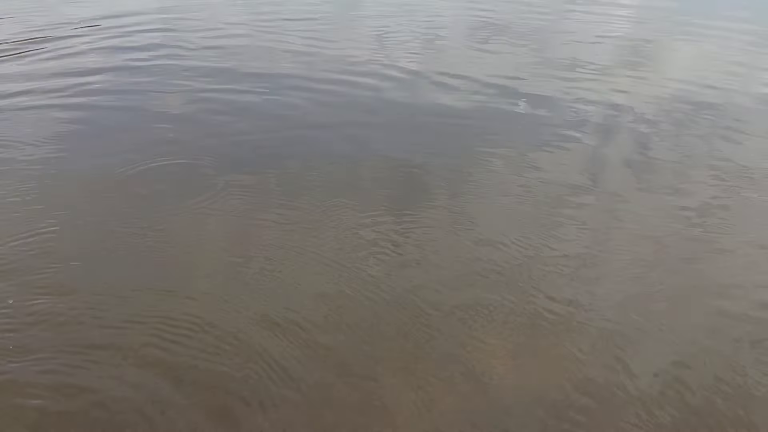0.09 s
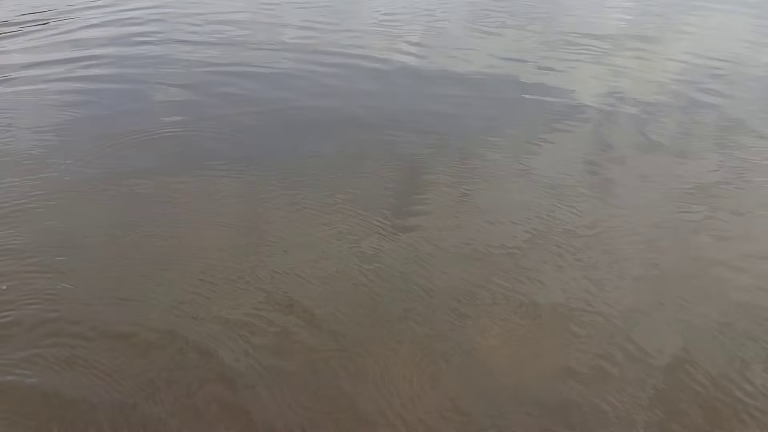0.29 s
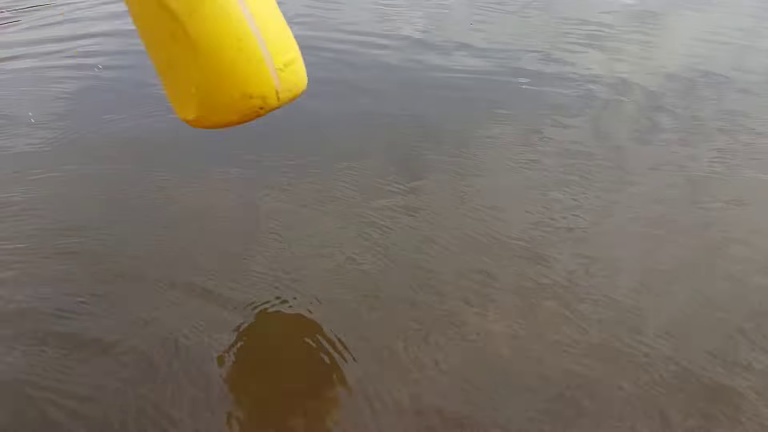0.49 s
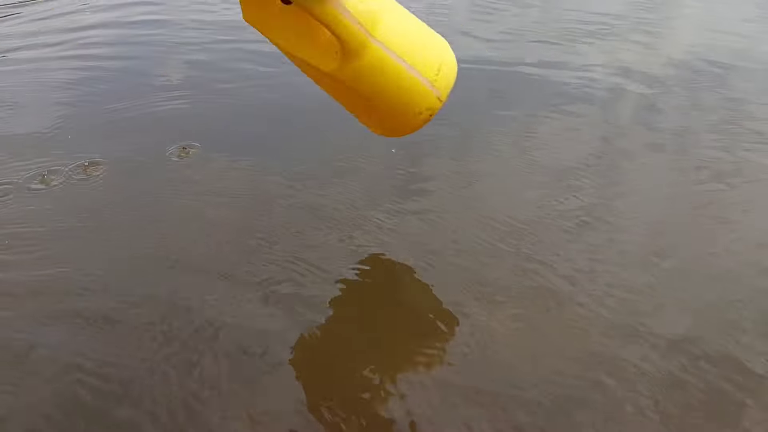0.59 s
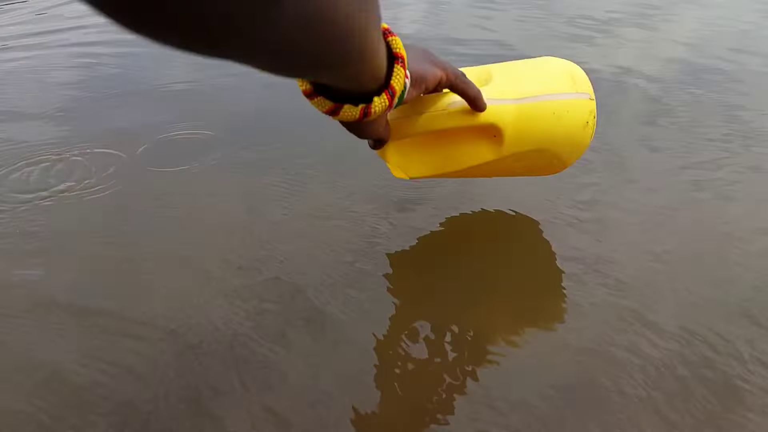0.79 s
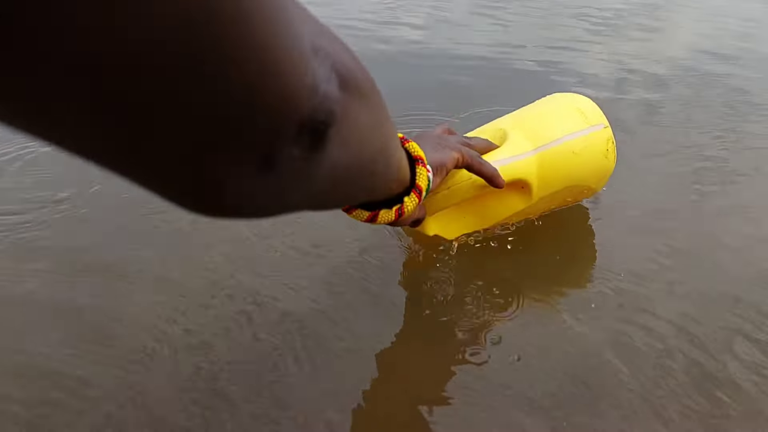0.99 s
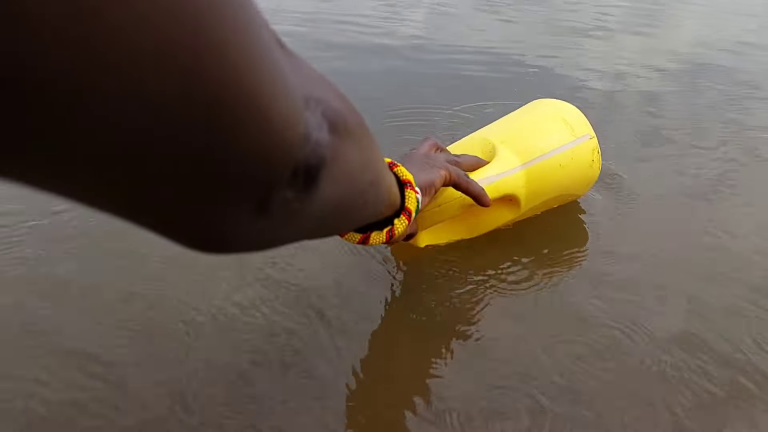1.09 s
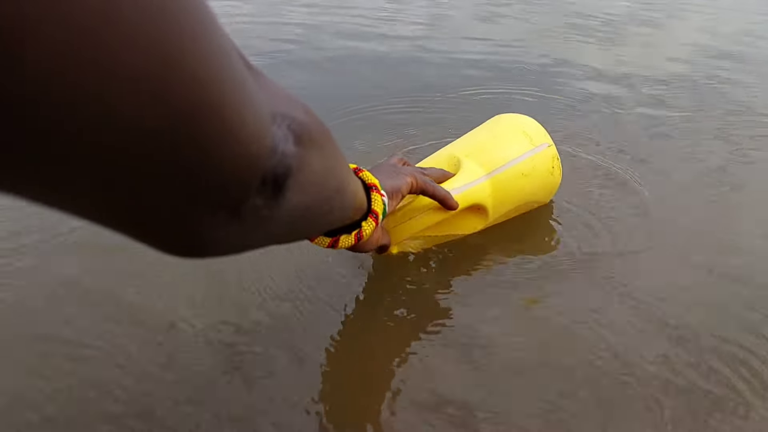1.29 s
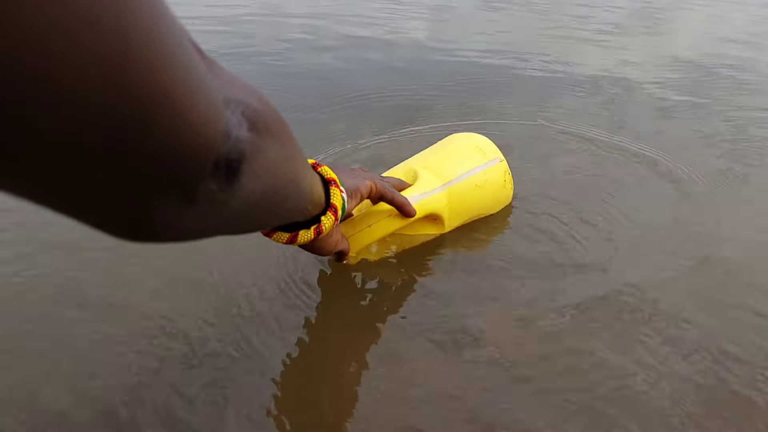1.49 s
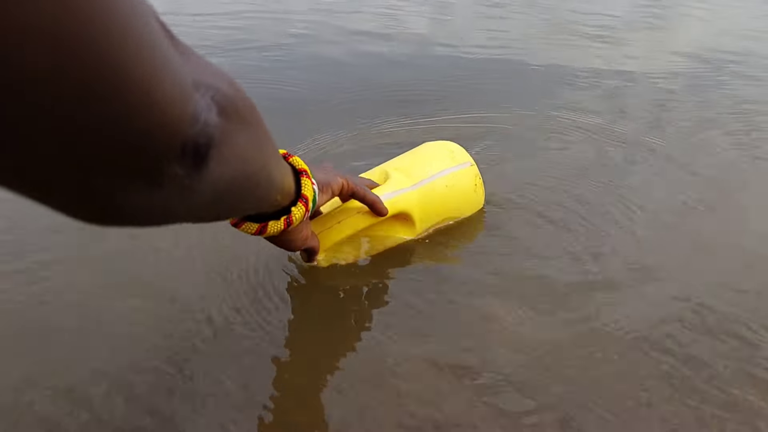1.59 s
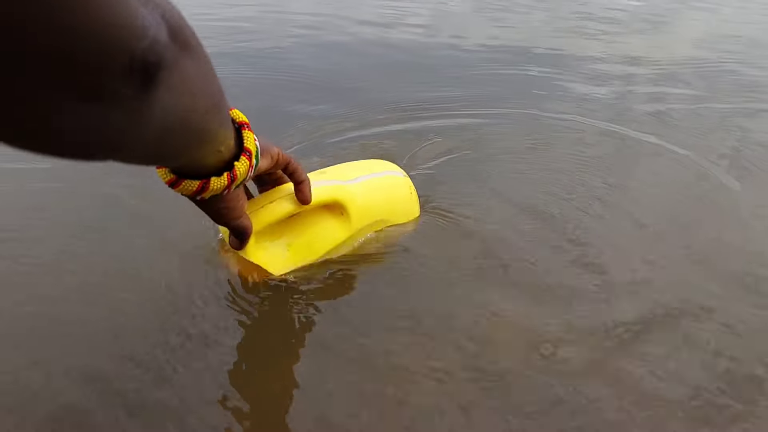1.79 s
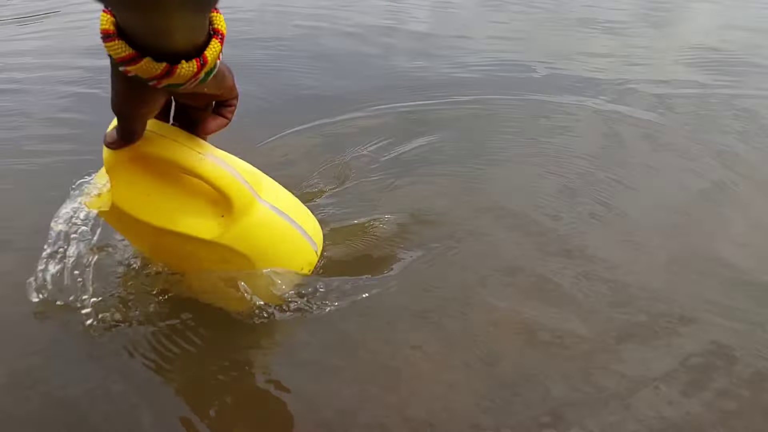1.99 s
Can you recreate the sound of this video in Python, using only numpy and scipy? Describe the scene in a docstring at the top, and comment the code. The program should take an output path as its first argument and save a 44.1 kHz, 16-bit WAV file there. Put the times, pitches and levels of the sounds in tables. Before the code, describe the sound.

Water splashes and gurgles as a plastic can is dunked, under gusts on the microphone.

```python
"""Flung water patters on a pond, on the left, as a plastic jerrycan is swung over it.
The can slaps the surface with a crack and a short hollow note, is pushed under and starts to fill:
splashes ring the air inside, small bubbles gurgle. A gust buffets the microphone from the start,
mostly its right port, and drops away before the filling."""
import sys
import numpy as np
from scipy import signal
from scipy.fft import rfft, irfft, next_fast_len
from scipy.io import wavfile
from scipy.ndimage import uniform_filter1d

SR = 44100
rng = np.random.default_rng(int(sys.argv[2]) if len(sys.argv) > 2 else 0)


def unload_audio(sound):
    """Save the sound as a 16-bit wav file, at the path given as the first command line argument."""
    columns = np.transpose(np.atleast_2d(sound))
    # keep every value between -1 and 1, then stretch to whole-number steps
    steps = np.round(np.clip(columns, -1, 1) * 32767)
    wavfile.write(sys.argv[1], SR, steps.astype(np.int16))


N = 88200
BUBBLE_RISE = 0.09  # fraction of pitch


def slap(crack_t60_s=0.017, crack_attack_s=0.00042):
    """The can meets the water edge first, then side: a wet crack and a short hollow ring."""
    # start_s, ring_db, crack_db
    hits = [(.6555, -18.5, -33.5), (0.6633, -24.5, -55)]
    # pitch_hz, level_db, t60_s, attack_s
    can_modes = [(372, 4, 0.04, 0.008), (292, -8.5, 0.044, 0.011), (1370, -20.5, 0.027, 0.00091),
                 (1543, -18, 0.019, 0.0012), (2470, -33, 0.036, .001), (3130, -26, .022, .001)]
    # freq_hz, level_db
    crack_colour = [(400, -1), (850, -20), (1400, 2.5), (1950, -25), (2800, 7), (4200, 2), (5800, -1),
                    (8000, -18.5), (13000, -7), (16000, -32)]
    out = np.zeros(N)
    for start_s, ring_db, crack_db in hits:
        t = clock() - start_s
        ring = sum(amp(db) * np.sin(2 * np.pi * hz * t) * decay(start_s, t60_s, attack_s)
                   for hz, db, t60_s, attack_s in can_modes)
        crack = noise(crack_colour)[0] * decay(start_s, crack_t60_s, crack_attack_s)
        out += amp(ring_db) * ring + amp(crack_db) * crack
    return pan(5) * out


def filling(gulp_db=5.5, gulp_hz=40.4, close_s=1.843, close_db_per_s=110):
    """Splashes ring the can's air in gulps; the note dips, then rises. Foam crackles at the neck."""
    # time_s, level_db
    inflow = [(1.3, -80), (1.44, -77), (1.54, -60.5), (1.595, -57), (1.63, -68), (1.69, -54.5), (1.74, -50),
              (1.785, -58), (1.81, -64), (2, -72.5)]
    # pitch_hz, width_hz, level_db, glide_exponent
    resonances = [(325, 84, 4, 1), (1285, 110, -5, 0.098), (2150, 260, -7, .03)]
    # time_s, pitch_hz
    air_note = [(1.56, 403), (1.6, 313), (1.654, 260), (1.7, 339), (1.76, 418), (1.87, 530)]
    splashes = patter(per_s=1000)
    glide = np.interp(clock(), *np.transpose(air_note)) / resonances[0][0]
    hollow = unit(sum(amp(db + gulp_db * waver(gulp_hz)) * resonate(splashes, hz * glide ** k, width_hz)
                      for hz, width_hz, db, k in resonances))
    hollow *= fade(close_s, close_db_per_s)  # water covers the neck
    fizz = amp(-12) * froth(per_s=350, typical_hz=5300, scatter=0.4, cycles=10)
    glugs = amp(-11) * froth(per_s=87, typical_hz=823, scatter=0.477, cycles=20)
    flow = level(inflow) * (clock() > inflow[0][0])
    return flow * pan(3.5) * (hollow + fizz + glugs)


def bubbles(pitch_waver=0.013, flicker_db=1.5, attack_s=0.00099):
    """Trapped air rings unevenly and rises in pitch as it nears the surface."""
    # start_s, pitch_hz, level_db, t60_s, pan_db
    rings = [(0.103, 1295, -57, 0.089, -8), (.0257, 2460, -34, 0.027, 5), (.03, 2850, -34.5, 0.026, 5),
             (.087, 3430, -38.5, 0.017, 12), (.4286, 3610, -31, .016, 7), (.437, 3560, -46, 0.021, 5),
             (.488, 526, -45, .035, 6), (.49, 2200, -49.5, .025, 1.5), (1.369, 11200, -55.5, 0.035, 12.5),
             (1.388, 1246, -59, .043, 1), (1.586, 1197, -53, 0.057, -3.5), (1.62, 2200, -54.5, 0.034, 0),
             (1.672, 2220, -48.5, 0.055, -2), (1.685, 1234, -49, 0.1, -2), (1.7266, 365, -31, 0.053, 3.5),
             (1.727, 4360, -38.5, 0.026, 10.5), (1.73, 6270, -46, .03, 5), (1.73, 2084, -42, 0.03, 3),
             (1.731, 1264, -32, 0.029, -1), (1.734, 1766, -34, 0.018, -4), (1.753, 413.5, -38, 0.089, 3.5),
             (1.831, 1800, -56, 0.027, -3), (1.851, 1360, -57, 0.035, -4), (1.902, 1960, -57, 0.026, 0),
             (1.859, 490, -51, 0.038, 2.5), (1.953, 2450, -52.5, 0.089, 0.5),
             (1.972, 1494, -32.5, 0.013, -1.5), (1.987, 1040, -50, 0.11, -5)]
    out = np.zeros((2, N))
    unsteady = 1 + pitch_waver * waver(rate_hz=300)
    for start_s, hz, db, t60_s, pan_db in rings:
        age = np.clip((clock() - start_s) / t60_s, 0, 1)
        pitch_hz = hz * unsteady * (1 + BUBBLE_RISE * age)
        phase = 2 * np.pi * np.cumsum(pitch_hz * (clock() > start_s)) / SR
        out += amp(db) * pan(pan_db) * np.sin(phase) * decay(start_s, t60_s, attack_s)
    return out * amp(flicker_db * waver(rate_hz=420))


def drops(log_width=0.31, attack_s=0.0017, crest_db=5):
    """Each drop strikes the pond with a short bright tick."""
    # start_s, peak_db, centre_hz, t60_s, pan_db
    impacts = [(0.015, -41, 4700, .03, 17), (0.029, -39, 6000, 0.017, 19), (0.0399, -27.5, 5730, 0.013, 18),
               (0.044, -38.5, 7600, 0.017, 8), (.074, -41, 6300, 0.021, 9), (0.089, -37, 4200, 0.015, 13),
               (.099, -50, 4370, 0.038, 11), (.131, -40, 6560, 0.0086, 7), (.191, -46, 3860, 0.012, 11.5),
               (.284, -32, 1980, 0.005, 11.5), (0.2857, -23.5, 5120, 0.011, 8.5),
               (0.329, -38, 7500, 0.0092, 2), (0.3363, -39.5, 10300, 0.0084, 21.5),
               (.407, -31, 13400, 0.0046, 21), (0.426, -41, 5140, 0.015, 6), (.473, -39, 5400, 0.012, 4),
               (.493, -35, 5760, 0.0075, 14.5), (.518, -42, 10800, .008, 16.5),
               (0.889, -45, 1880, 0.0216, 2), (0.895, -46.5, 5630, .035, 9), (1.455, -47.5, 5900, 0.014, 3),
               (1.65, -42, 6200, 0.027, 4.5), (1.648, -46.5, 2970, 0.037, 3.5), (1.77, -40, 3770, 0.014, 4),
               (1.874, -49, 6900, 0.017, 10.5), (1.948, -41.5, 6300, 0.0055, 13),
               (1.972, -46, 5450, 0.013, -3)]
    out = np.zeros((2, N))
    for start_s, peak_db, centre_hz, t60_s, pan_db in impacts:
        band = lambda hz: 1 / (1 + np.abs(np.log((hz + 1) / centre_hz) / log_width) ** 3)
        tick = unit(filtered(rng.standard_normal(N), band))
        out += amp(peak_db - crest_db) * pan(pan_db) * tick * decay(start_s, t60_s, attack_s)
    return out


def shower():
    """Dense spray spatters on the pond, leaves tiny bubbles and fades."""
    # time_s, level_db
    flow = [(0, -57), (.03, -49), (.06, -56.5), (.09, -55), (.11, -60.5), (.135, -84), (.25, -84.5),
            (.3, -65.5), (.5, -74), (.65, -87)]
    # freq_hz, level_db
    colour = [(20, -35), (150, 9), (650, 8.5), (1100, 6.5), (1700, 3.5), (3200, -3.5), (7000, -6.5),
              (9000, -21.5), (12500, -2.5), (16000, -19)]
    foam = amp(-6.5) * froth(per_s=500, typical_hz=3474, scatter=0.32, cycles=120)
    spatter = coloured(patter(per_s=5000), colour)
    return level(flow) * pan(1.5) * (spatter + foam)


def swishes(attack_s=0.0053, t60_s=0.044, spread=0.063):
    """Soft swishes as the can is swung and pushed under."""
    # start_s, length_s, level_db
    moves = [(0.367, 0.052, -60.5), (0.677, 0.037, -64), (0.884, 0.045, -57.5), (1.003, 0.058, -52)]
    # freq_hz, level_db
    colour = [(300, 6.5), (700, 8.5), (1000, 8.5), (1400, 4), (2100, 5.5), (2700, -10.5), (6000, -8.5),
              (10000, -27.5)]
    envelope = np.zeros(N)
    for start_s, length_s, db in moves:
        rise = np.clip((clock() - start_s) / attack_s, 0, 1)
        envelope += amp(db) * rise * fade(start_s + length_s, 60 / t60_s)
    return envelope * pan(1) * unit(noise(colour) + spread * noise(colour, channels=2))


def wind(ceiling_db=-14.5):
    """Eddies buffet each microphone port separately; the height of the gust flutters brighter."""
    # time_s, level_db
    gust_left = [(0, -43.5), (.17, -51), (.38, -44.5), (.43, -39.5), (.53, -51), (.62, -40.5), (.75, -43.5),
                 (.81, -30), (.85, -35.5), (.89, -26), (.99, -33), (1.05, -51.5), (1.115, -28.5),
                 (1.17, -35.5), (1.225, -44.5), (1.27, -57.5)]
    gust_right = [(0.1, -50), (0.15, -54), (0.212, -28), (0.238, -36.5), (0.312, -25), (0.376, -36.5),
                  (0.42, -30), (0.528, -42), (0.588, -34), (0.624, -37), (0.666, -36.5), (0.698, -44),
                  (0.856, -21.5), (0.918, -26.5), (1.07, -15), (1.1, -31.5), (1.162, -13), (1.19, -31)]
    flutter_mix = [(.2, -25), (.3, -18), (.4, -22.5), (.7, -25.5), (.79, -6), (.835, -4), (.92, -16.5),
                   (1.0, -10), (1.06, 3.5), (1.1, -2), (1.17, -8)]
    # freq_hz, level_db
    eddy_colour = [(8, -59), (18, -28.5), (30, -6.5), (58, 2.5), (90, -5), (150, -10), (220, -18.5),
                   (320, -33), (500, -53.5), (1000, -71.5), (2000, -120)]
    flutter_colour = [(12, -73.5), (50, -39.5), (130, 3), (200, 3), (290, -2.5), (400, -16), (550, -20.5),
                      (750, -35.5), (1100, -54), (2200, -85.5)]
    left = level(gust_left) * np.interp(clock(), [1.26, 1.4], [1, 0.45])
    right = amp(4.5) * level(gust_right) * fade(start_s=1.185, db_per_s=1411)
    ports = []
    for gust, flutter_db in ((left, -6.5), (right, 0)):
        bright = amp(flutter_db) * level(flutter_mix)
        buffet = turbulence(eddy_colour) + bright * turbulence(flutter_colour)
        ports.append(np.minimum(gust, amp(ceiling_db)) * buffet / np.sqrt(1 + bright ** 2))
    return np.array(ports)


def thumps(width_cycles=0.53):
    """Single eddies give the right port a short push and pull."""
    # centre_s, pitch_hz, peak_db
    eddies = [(.211, 69, -21.5), (0.27, 107, -19.5), (.305, 91, -16), (0.319, 106, -17.5),
              (.424, 68, -21.5), (0.591, 56, -17.5), (.829, 249, -12.5), (0.854, 59, -13.5),
              (.966, 228, -13.5), (0.98, 208, -11), (1.042, 242, -5.5), (1.059, 305, -5),
              (1.072, 118, -8.5), (1.132, 223, -15), (1.176, 166, -10), (1.243, 475, -46.5),
              (1.302, 532, -45.5)]
    right = np.zeros(N)
    for centre_s, hz, db in eddies:
        turns = (clock() - centre_s) * hz
        right += amp(db) * np.cos(2 * np.pi * turns) * np.exp(-(turns / width_cycles) ** 2 / 2)
    return np.array([np.zeros(N), right])


def echo(x):
    """Short scatter from the water and the bank."""
    tail = rng.standard_normal((2, N)) * decay(start_s=0.002, t60_s=0.043, attack_s=0.0033)
    return signal.fftconvolve(x, tail / np.linalg.norm(tail[0]), axes=1)[:, :N]


def air(hiss_right_db=-10.5):
    """Quiet open air, and a smooth hiss that swells with the gust."""
    # time_s, level_db
    swell = [(0, -48), (.15, -61), (.25, -65.5), (.4, -62), (.87, -60.5), (.9, -53), (1.05, -53),
             (1.16, -53), (1.24, -58), (1.28, -72), (1.45, -68), (1.6, -58.5), (1.85, -71.5), (2, -63.5)]
    # freq_hz, level_db
    hiss_colour = [(300, 18), (1000, -2.5), (2600, 0), (3500, 1), (6300, 1), (8700, -8), (12500, 0),
                   (16000, -16.5)]
    air_colour = [(8, -40.5), (25, -16.5), (65, -1.5), (140, -4), (280, 2.5), (450, -17), (900, -22),
                  (1700, -24), (2600, -20), (3500, -29.5), (6000, -47.5), (12000, -26), (16000, -47.5)]
    hiss = level(swell) * amp([[0], [hiss_right_db]]) * noise(hiss_colour, channels=2)
    return amp(-66) * pan(5.5) * noise(air_colour, channels=2) + hiss


def froth(per_s, typical_hz, scatter, cycles, size_db=3, pool=1200):
    """Random cloud of small bubbles, each dying 60 dB in `cycles` periods."""
    start, pitch = rng.random(pool), rng.standard_normal(pool)
    size, side = rng.exponential(1, pool), rng.uniform(-1.9, 1, pool)
    k = np.arange(SR // 25)  # 40 ms per bubble
    turns = typical_hz * np.exp(scatter * np.clip(pitch, -2, 2))[:, None] * k / SR
    age = turns / cycles
    phase = 2 * np.pi * turns * (1 + BUBBLE_RISE * np.minimum(age, 1) / 2)
    rings = np.sin(phase) * (1 - np.exp(-turns)) * np.exp(-np.log(1000) * age)
    gain = np.clip(per_s * N / SR - np.arange(pool), 0, 1) * amp(size_db * np.minimum(size, 2))
    at = ((start * N).astype(int)[:, None] + k).ravel()
    panned = [rings * (gain * (1 + ear * side / 2))[:, None] for ear in (1, -1)]
    return unit(np.array([np.bincount(at, x.ravel(), N)[:N] for x in panned]))


def patter(per_s, pool=16000):
    """Random tiny impacts, each panned separately."""
    at = (rng.random(pool) * N).astype(int)
    size, side = rng.uniform(0.39, 2.6, pool), rng.uniform(-1.1, 1, pool)
    active = np.clip(per_s * N / SR - np.arange(pool), 0, 1)
    kicks = active * size * np.sign(rng.standard_normal(pool))
    return np.array([np.bincount(at, kicks * (1 + ear * side * 0.57), N) for ear in (1, -1)])


def turbulence(colour):
    """Noise whose strength holds from one eddy to the next."""
    x = noise(colour)[0]
    power = uniform_filter1d(uniform_filter1d(x * x, size=900), size=900)
    return x / np.sqrt(np.abs(power) + 0.02)


def resonate(x, hz, width_hz):
    """x through a steep moving resonance, rms 1."""
    carrier = np.exp(2j * np.pi * np.cumsum(hz) / SR)
    pole = np.exp(-np.pi * width_hz / SR)
    return unit((carrier * signal.lfilter([1], np.poly([pole, pole]), x / carrier)).real)


def waver(rate_hz):
    """Smooth random curve, rms 1."""
    return unit(filtered(rng.standard_normal(N), lambda hz: np.exp(-(hz / rate_hz) ** 2)))


def noise(colour, channels=1):
    """Coloured noise, independent per channel."""
    return coloured(rng.standard_normal((channels, N)), colour)


def coloured(x, colour):
    """x shaped by (freq_hz, level_db) points, rms 1."""
    freq_hz, db = np.transpose(colour)
    return unit(filtered(x, lambda hz: amp(np.interp(np.log(hz + 1), np.log(freq_hz), db))))


def filtered(x, response):
    """x through a frequency response."""
    m = next_fast_len(N + SR // 2)
    return irfft(rfft(x, m) * response(np.fft.rfftfreq(m, 1 / SR)), m)[..., :N]


def lead(x, lead_s):
    """Left arrives lead_s before right."""
    return filtered(x, lambda hz: np.exp(1j * np.pi * hz * lead_s * np.array([[1], [-1]])))


def decay(start_s, t60_s, attack_s):
    """Envelope that rises and dies away."""
    t = np.maximum(clock() - start_s, 0)
    return (1 - np.exp(-t / attack_s)) * np.exp(-np.log(1000) * t / t60_s)


def fade(start_s, db_per_s):
    """Gain 1 until start_s, then falling."""
    return amp(-db_per_s * np.maximum(clock() - start_s, 0))


def level(points):
    """Gain per sample from (time_s, level_db) points."""
    return amp(np.interp(clock(), *np.transpose(points)))


def pan(db):
    """Stereo gains, left over right by db."""
    return amp(np.array([[db], [-db]]) / 2)


def amp(db):
    """Decibels to gain."""
    return 10 ** (np.asarray(db) / 20)


def unit(x):
    """Scale to rms 1."""
    return x / np.sqrt(np.mean(x ** 2) + 1e-20)


def clock():
    """Sample times in seconds."""
    return np.arange(N) / SR


def scene():
    """Water and can in the open air, under the gust."""
    flung = lead(shower() + drops(), lead_s=0.0004236)
    can = lead(bubbles() + slap() + swishes() + filling(), lead_s=0.00012)
    water = flung + can
    return water + amp(-12.5) * echo(water) + wind() + thumps() + air()


def record(dry, top_hz=16300):
    """Hard band limit."""
    return filtered(dry, lambda hz: hz < top_hz)


dry = scene()
out = record(dry)
unload_audio(out)
```